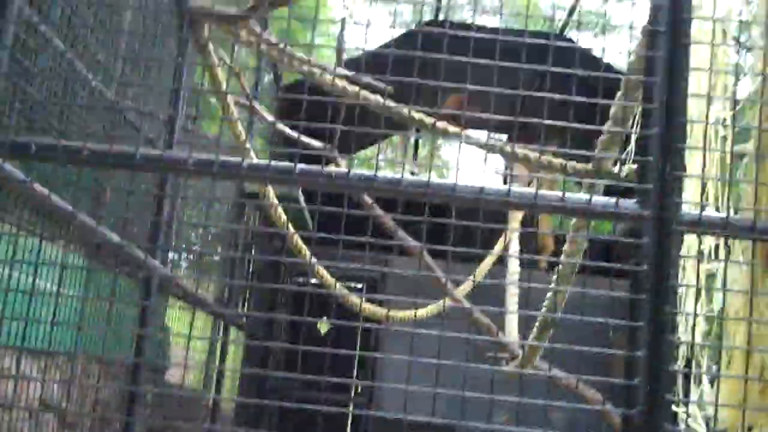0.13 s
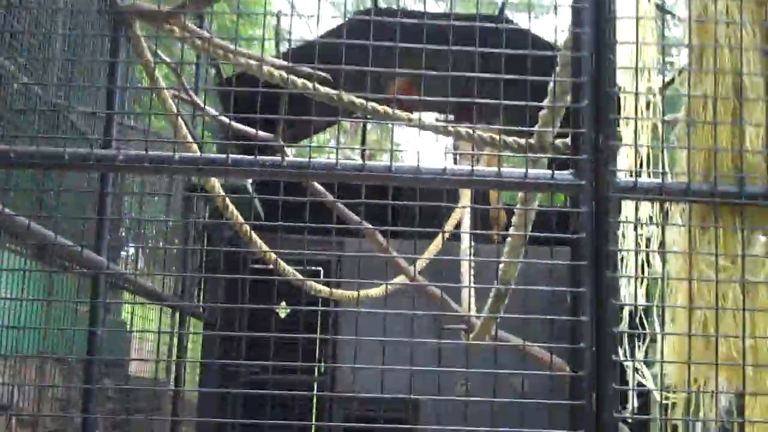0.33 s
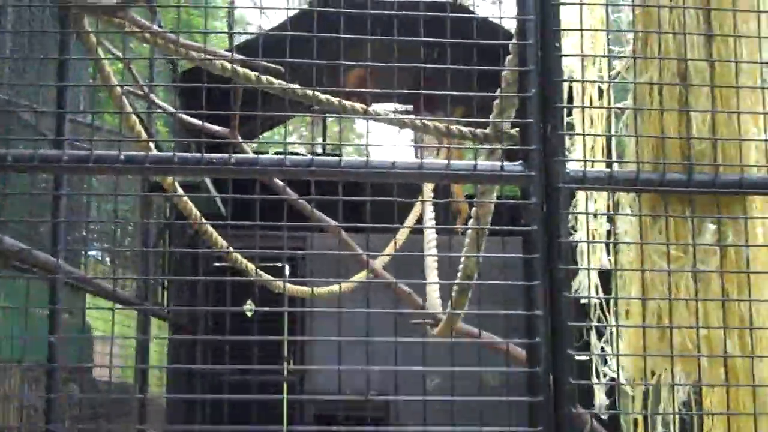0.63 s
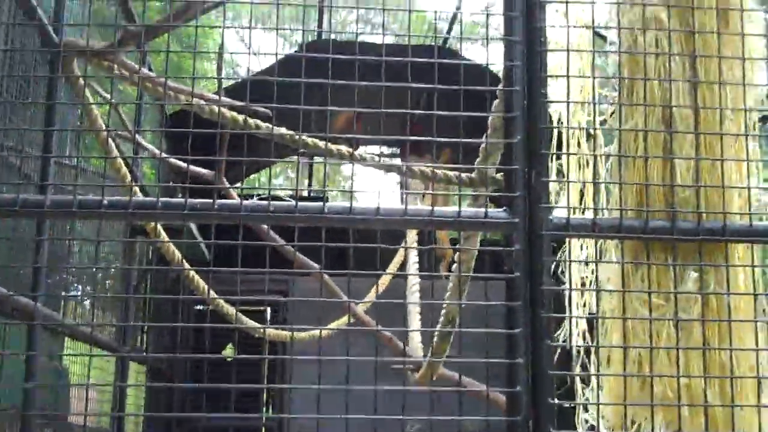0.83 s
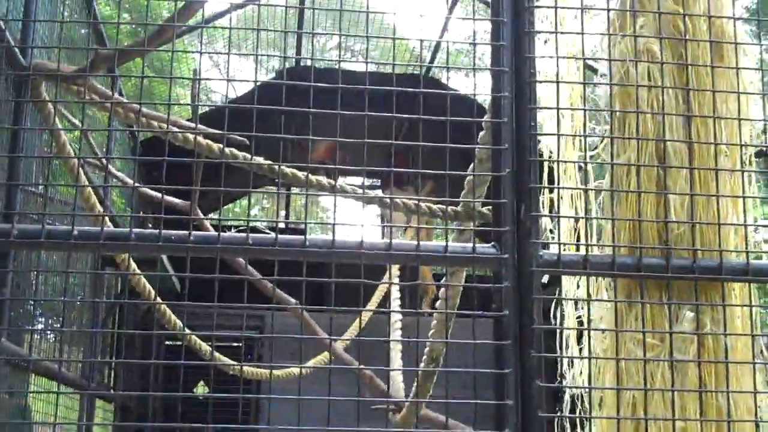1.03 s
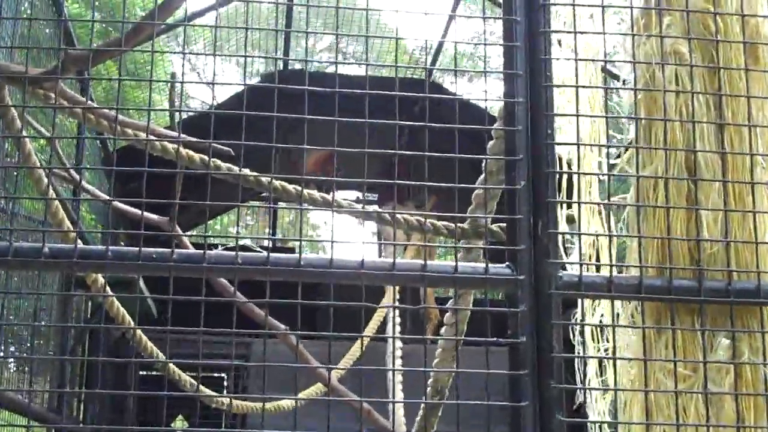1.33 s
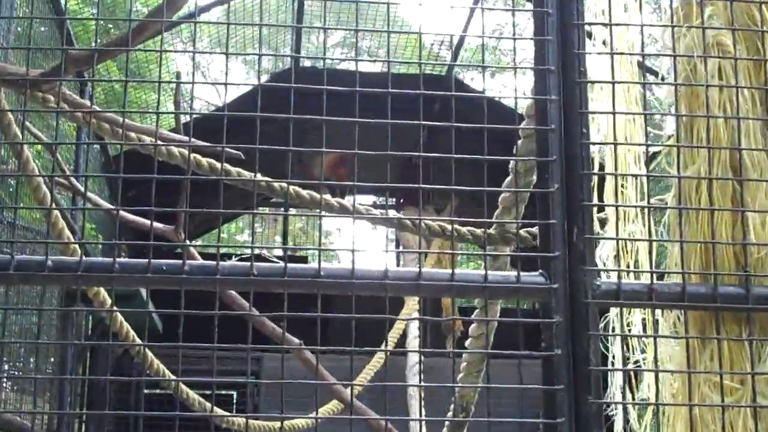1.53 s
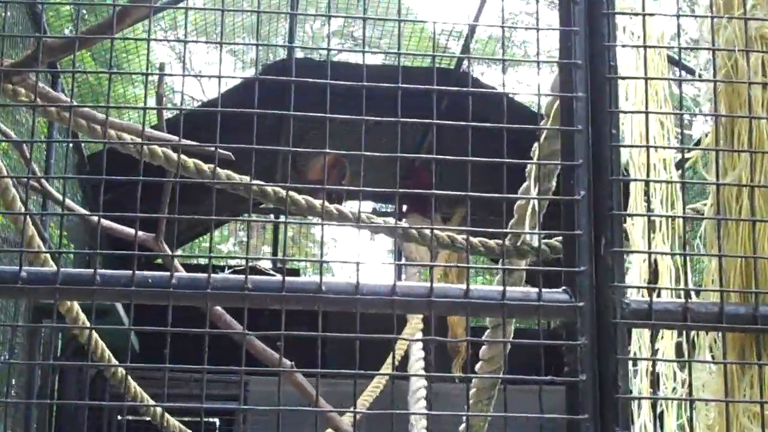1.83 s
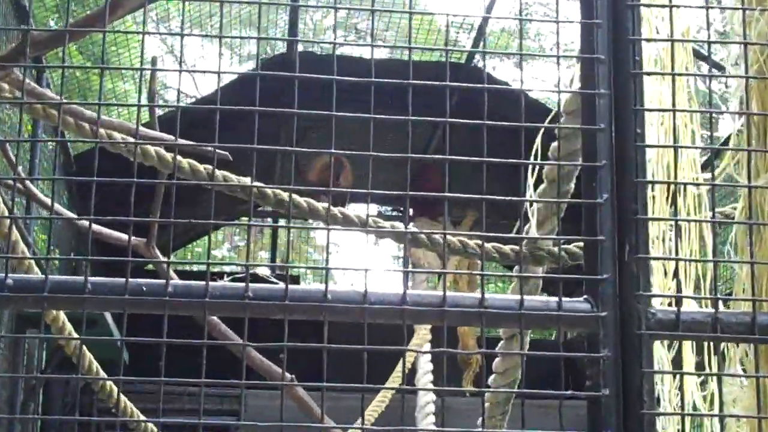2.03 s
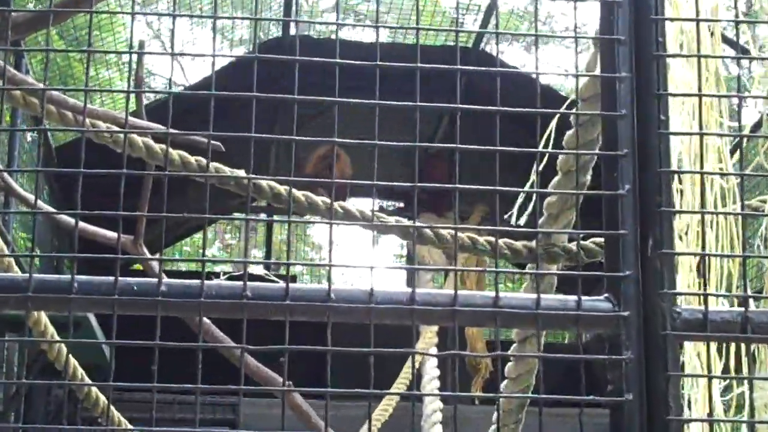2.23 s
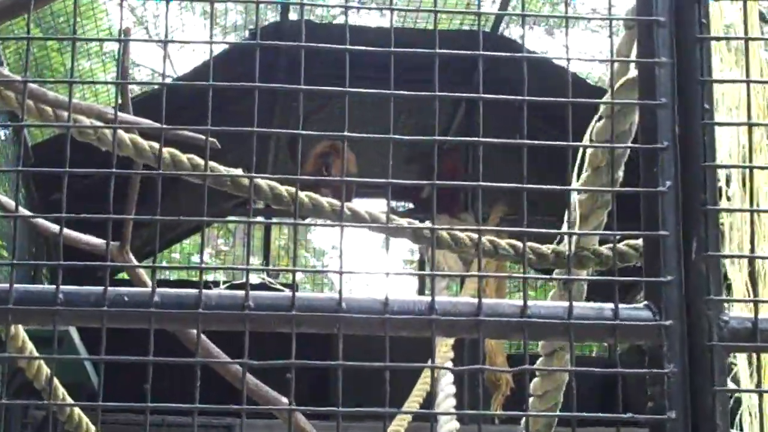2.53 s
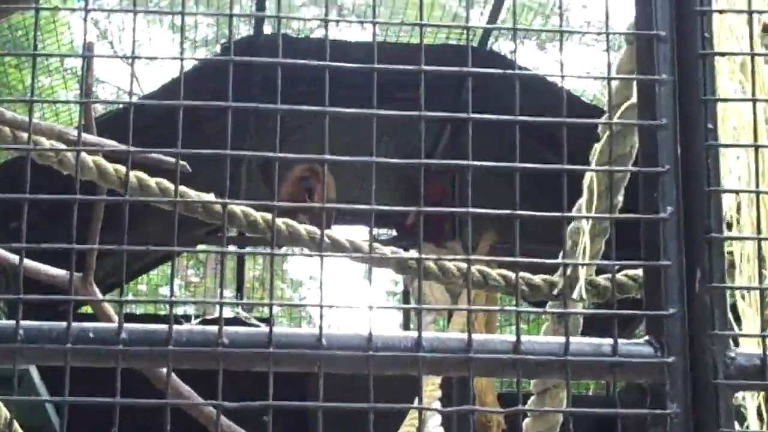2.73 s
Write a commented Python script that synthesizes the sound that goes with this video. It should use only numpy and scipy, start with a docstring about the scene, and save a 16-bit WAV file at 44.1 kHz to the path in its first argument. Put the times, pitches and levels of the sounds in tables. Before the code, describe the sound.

A howler monkey's loud, hoarse roar breaks into a rattling rasp, pauses, then swells again

```python
"""Howler monkey roaring under a roof

A howler monkey roars under the roof of its cage, a few metres from two microphones.
Source-filter synthesis: chaotic pulses of its vocal folds ring resonances of the throat and mouth.
An open roar gives way to a rattling rasp (probably drawn inwards), a short gap, then a new roar
that swells as the mouth opens. Filtered noise makes a thin squeak and a low outdoor rumble behind it."""
import sys
import numpy as np
from scipy import signal
from scipy.fft import rfft, irfft
from scipy.io import wavfile
from scipy.ndimage import uniform_filter1d

SR = 44100
rng = np.random.default_rng(int(sys.argv[2]) if len(sys.argv) > 2 else 0)


def pcm_store(signal):
    """Save signal as 16-bit PCM."""
    levels = np.round(np.clip(np.atleast_2d(signal), -1, 1) * 32767)
    wavfile.write(sys.argv[1], SR, levels.astype(np.int16).T)


N = 127449
T = np.arange(N) / SR  # time axis in seconds

# vocal folds: time_s, rate_pulses_per_s, air_share (power share of rushing air, 0-1)
FOLDS = [(0, 420, 0.24), (.47, 380, 0.24), (.56, 170, 0.21), (1.05, 105, .2), (1.42, 90, 0.19),
         (1.6, 108, 0.33), (1.9, 160, 0.13), (2.15, 330, 0.32), (2.89, 395, 0.27)]
# heaves of air in the rasp and at the restart of the roar: time_s (end of the rise), push_db
HEAVES = [(.505, 3.2), (.521, 5), (0.558, 6.5), (0.611, 4), (0.644, 2), (0.676, 4), (0.697, 5), (.732, 9),
          (.756, 4), (.838, 5.5), (.866, 4), (0.942, 5.2), (0.981, 7), (1.022, 6), (1.219, 5), (1.266, 4),
          (1.416, 5), (1.441, 3.5)]
# loudness of the voice before the trim of each band: time_s, bass_db, middle_db, treble_db
LEVELS = [(0, -16.5, -24.5, -35.5), (0.2, -16.5, -24, -35), (0.45, -17.5, -23.5, -32),
          (0.56, -17.0, -27.5, -34.5), (0.74, -19.5, -29.5, -36.5), (0.8, -21, -28.5, -40.5),
          (0.86, -20.5, -30, -35.5), (0.93, -24.5, -32, -39.5), (1.02, -22.5, -30, -37),
          (1.09, -23, -35, -46.5), (1.14, -34, -46, -52), (1.205, -45, -50.5, -52), (1.225, -38, -43, -49),
          (1.258, -35.5, -49, -53), (1.272, -33, -38, -47.5), (1.31, -23.5, -37, -47),
          (1.385, -31.5, -39.5, -47.5), (1.44, -26.5, -36.5, -43.5), (1.63, -24, -32, -48.5),
          (1.72, -25.0, -31.5, -46.5), (1.92, -22.0, -28.5, -43.5), (2.3, -20.5, -29, -39.5),
          (2.5, -18.0, -27.0, -38.5), (2.89, -18.0, -25, -38)]


def amp(db):
    """Level law: decibels to amplitude gain."""
    return 10 ** (np.asarray(db) / 20)


def evened(x):
    """Power normalisation: scales to rms 1."""
    return x / np.sqrt(np.mean(x ** 2) + 1e-20)


def curve(rows, axis=1):
    """Linear interpolation in time: one column of a time table, at every sample."""
    rows = np.array(rows)
    return np.interp(T, rows[:, 0], rows[:, axis])


def read(rows, hz, axis=1):
    """Linear interpolation on a log-frequency axis: one column of a spectrum table."""
    rows = np.array(rows)
    return np.interp(np.log(hz + 1), np.log(rows[:, 0] + 1), rows[:, axis])


def drift(hz):
    """Low-passed noise: a random wander of rms 1 that weakens above the given rate."""
    rates = np.fft.rfftfreq(N, 1 / SR)
    spectrum = rfft(rng.standard_normal(N)) / (1 + (rates / hz) ** 2)
    return evened(irfft(spectrum, N))


def colour(x, rows, axis=1, size=4096):
    """Minimum-phase filtering: the log spectrum fixes the phase, so the filter is causal."""
    hz = abs(np.fft.fftfreq(size, 1 / SR))
    log_gain = np.log(amp(read(rows, hz, axis=axis)))
    taps = np.fft.ifft(np.exp(np.conj(signal.hilbert(log_gain)))).real
    return signal.oaconvolve(x, taps[:size // 2])[:N]


def resonate(x, hz, width):
    """Heterodyned one-pole resonance of gain 1 at its centre, which follows the curve hz."""
    turn = np.exp(2j * np.pi * np.cumsum(hz * np.ones(N)) / SR)
    r = np.exp(-np.pi * abs(width) / SR)
    # shift the centre to zero frequency, smooth, shift back
    envelope = signal.lfilter([1 - r], [1, -r], x / turn + 1e-18)
    return 2 * (turn * envelope).real


def whistle(hz, width):
    """Narrow-band noise: two resonances in series make a fuzzy tone of rms 1."""
    once = resonate(rng.standard_normal(N), hz, width)
    return evened(resonate(once, hz, width))


def background():
    """Distant outdoor rumble by spectral shaping of partly correlated noise, with a wavering hum."""
    # outdoor rumble, relative spectrum: frequency_hz, level_db
    floor_colour = [(20, -9), (40, -11.5), (60, -10.5), (120, -11.5), (250, -7), (600, -11), (1500, -24),
                    (4000, -29), (9000, -31.5), (14000, -61)]
    # hum, before its tilt between the ears: frequency_hz, width_hz, level_db
    hum_tones = [(38.9, 4.9, -52.5), (81.2, 7.9, -53.5)]
    shared_level_db = -43.5
    both, left, right = (evened(colour(rng.standard_normal(N), floor_colour)) for _ in range(3))
    rumble = amp(shared_level_db) * (both + 0.22 * np.array([left, right]))
    hum = sum(amp(db) * whistle(hz, width) for hz, width, db in hum_tones)
    return rumble + hum * amp([[-2], [1.5]])  # left, right dB


def squeak():
    """Decaying narrow-band noise with its octave: a brief squeak to the right, perhaps a small bird."""
    start_s, rise_s, t60_s = 1.487, 0.01179, 0.4
    pitch_hz, width_hz, octave_db = 6280, 190, -27.5
    age = np.maximum(T - start_s, 0)
    tone = whistle(pitch_hz, width_hz) + amp(octave_db) * whistle(2 * pitch_hz, 2 * width_hz)
    fade = amp(-31.5 - 60 * age / t60_s)
    return tone * np.minimum(age / rise_s, 1) * fade * amp([[-5], [0]])  # left, right dB


def echoes(x, t60_rows, size=16384):
    """Statistical reverberation: a dense noise tail, each band dying exponentially at its own speed."""
    hz, t, z = signal.stft(rng.standard_normal(size), SR, nperseg=128)
    decay = amp(-60 * t / read(t60_rows, hz)[:, None])
    tail = signal.istft(z * decay, SR, nperseg=128)[1]
    return signal.oaconvolve(x, tail / np.linalg.norm(tail))[:N]


def heaves():
    """Amplitude modulation: sudden pushes of air break the rasp into strokes and restart the roar."""
    rise_s, fade_s = 0.002237, 0.010903
    push_db = np.zeros(N)
    for time_s, db in HEAVES:
        age = np.maximum(T - time_s + rise_s, 0)
        push_db += db * np.minimum(age / rise_s, 1) * np.exp(-(age / fade_s) ** 2)
    return amp(push_db)


def slap_times(gap):
    """Phase-reset oscillation: samples of an uneven beat that each heave of air starts afresh."""
    jitter = .17  # spread of the log of the gaps between slaps
    cycles = np.cumsum(curve(FOLDS, axis=1)) / SR
    beats = np.cumsum(np.exp(jitter * gap - jitter ** 2 / 2))
    for time_s, _ in HEAVES:
        now = np.interp(time_s, T, cycles)
        nearest = np.argmin(abs(beats - now))
        beats[nearest:] += now - beats[nearest]
    return np.searchsorted(cycles, beats)


def scatter(x):
    """All-pass diffusion: quick reflections smear each slap over milliseconds without colouring it."""
    # quick reflections: delay_s, strength (0-1)
    reflections = [(.0017, 0.26), (.0043, 0.36), (.0097, 0.24)]
    for delay, g in reflections:
        lag = np.exp(-2j * np.pi * np.fft.rfftfreq(N, 1 / SR) * delay)
        x = irfft(rfft(x) * (lag + g) / (1 + g * lag), N)
    return x


def folds():
    """Glottal excitation: irregular slaps of the folds, each freeing a noisy puff that carries treble."""
    shimmer_db, puff_shimmer_db = 1.9, 3.5  # slap-to-slap variation
    puff_s, steady_air, slap_hz = .0008, .15, 3158
    rate, air = curve(FOLDS, axis=1), curve(FOLDS, axis=2)
    gap, size = rng.standard_normal((2, 2000))
    at = slap_times(gap)
    bounded_size = np.tanh(size / 2) * 2
    # dividing by sqrt(rate) keeps the power even as the rate changes
    slaps, spurts = (np.bincount(at, amp(db * bounded_size), N + 1)[:N] / np.sqrt(rate)
                     for db in (shimmer_db, puff_shimmer_db))
    age = T[:1000] / puff_s
    opening = evened(signal.oaconvolve(spurts, age * np.exp(-age))[:N])
    puffs = evened((opening + steady_air) * rng.standard_normal(N))
    softness = np.exp(-2 * np.pi * slap_hz / SR)  # one-pole low-pass
    soft_slaps = signal.lfilter([1 - softness], [1, -softness], evened(slaps - slaps.mean()))
    flutter = amp(1.1203 * drift(60))  # rms dB, rate Hz
    return (np.sqrt(1 - air) * scatter(soft_slaps) + np.sqrt(air) * puffs) * flutter


def throat_sac(x):
    """Formant resonance: two sliding bass formants tremble with effort; their ringing is partly
    evened by its running power."""
    # bass formants of the throat sac: time_s, first_hz, second_hz
    formants = [(0, 510, 1025), (0.2, 510, 1005), (0.4, 505, 972), (0.55, 476, 945), (0.72, 460, 932),
                (0.88, 480, 930), (1.05, 538, 920), (1.33, 518, 955), (1.7, 508, 968), (2.1, 501, 980),
                (2.5, 507, 996), (2.89, 503, 1003)]
    # sharpness of each formant: width_hz, lift_db (before evening), wobble_hz (rms at full effort)
    formant_rings = [(37.8, 20, 8.7), (37.5, 19.5, 16)]
    wobble_rate_hz, ring_s, evening = 26, .02, 0.26  # evening: 0 none - 1 full
    effort = amp(curve(LEVELS, axis=1))
    for k, (width, lift_db, wobble_hz) in enumerate(formant_rings):
        tremble = wobble_hz * effort / effort.max() * drift(wobble_rate_hz)
        ring = resonate(x, curve(formants, axis=k + 1) + tremble, width)
        power = abs(uniform_filter1d(evened(ring) ** 2, int(ring_s * SR) + 1)) + 1e-6
        x = x + (amp(lift_db) - 1) * ring / power ** (evening / 2)
    return x


def mouth(x, broad, peaks, shape):
    """Vocal-tract filtering: resonances slide, swell and fade as the mouth shape goes from 0 to 1."""
    x = colour(x, broad)
    for hz0, hz1, width, *lifts_db in peaks:
        lift_db = np.interp(shape, np.linspace(0, 1, len(lifts_db)), lifts_db)
        x = x + (amp(lift_db) - 1) * resonate(x, hz0 + (hz1 - hz0) * shape, width)
    return evened(x)


def monkey(size=2601):
    """Source-filter voice: roar and rasp take turns; bass, middle and treble follow level curves."""
    # mouth in the roar: time_s, opening (0 narrow - 1 wide)
    mouth_opening = [(0, 0.98), (.5, .97), (1.3, 0), (1.48, 0.096), (1.63, 0.32), (1.87, 0.58), (2.15, .7),
                     (2.45, 0.87), (2.89, 1)]
    # upper resonances of the roar: narrow_hz, wide_hz, width_hz,
    # then lift_db with the mouth narrow, a third open, two thirds open, wide
    roar_peaks = [(1282, 1231, 64, 10, 12, 18, 17), (1948, 1897, 39, 13, 14, 22, 23.5),
                  (2570, 2330, 44, 9, 22, 18.5, 16.5), (2946, 2812, 58, 16, 11, 22, 19),
                  (3474, 3229, 56, 14, 17, 15.5, 11.5), (4060, 3989, 61, 2.5, 20, 7, 15),
                  (4250, 4420, 230, 0, -2, -10, -20), (4567.6, 4815, 49, 27.5, 14, 17, 28.5),
                  (5080, 5290, 143, 9, 15.5, 17.5, 9), (5420, 5750, 93, 4, 5, 7, 16),
                  (6620, 6580, 44, 19.5, 5, 13.955, 20.5), (7136.5, 7510, 116.9, 7.5, 12, 12.5, 14),
                  (7843, 8272.1, 160, 4, 4, 8.5, 13), (9400, 9636, 126.6, 5, 10, 15.66, 18.5),
                  (11329, 11291, 100, 0.5, 7.7, 13, 8)]
    # broad colour of the roar: frequency_hz, level_db
    roar_colour = [(90, -40.5), (200, -12), (310, -9.5), (440, -2.5), (600, -4.5), (800, -1.5), (1100, -5),
                   (1290, -11.5), (1450, -21.5), (1680, -22.5), (2100, -8), (2800, -6.5), (3500, -16),
                   (4400, -30.5), (5200, -18.5), (7000, -13.5), (8400, -18), (9100, -36), (14000, -43)]
    # tongue and jaw in the rasp: time_s, shape (0 start shape - 1 end shape)
    jaw_shape = [(.5, 0.12), (.72, 0.14234), (.9, 0.62), (1.02, 0.98), (1.2, 0.86)]
    # upper resonances of the rasp: start_hz, end_hz, width_hz, start_lift_db, end_lift_db
    rasp_peaks = [(1180, 1180, 115, 12.5, -2.5), (1846.7, 1959.3, 41, 22, 15), (2298, 2327, 51.4, 15, 18.5),
                  (2536.8, 2930, 39, 14, 13), (3130, 3470, 62, 3, 13.5), (3790, 4240, 114, 8.5, 15),
                  (4820, 4400, 86.8, 9, 10)]
    # broad colour of the rasp: frequency_hz, level_db
    rasp_colour = [(60, -23), (110, -11), (165, -14), (300, -6.5), (410, -4), (650, -6), (850, -4.5),
                   (1200, -10.5), (1380, -23), (1650, -20.5), (2100, -8.5), (2700, -7), (3600, -16.5),
                   (4400, -24), (5600, -12.5), (7000, -8), (8500, -22), (10500, -38.5), (14000, -52.5)]
    # trim of the bass, middle and treble: trim_db
    band_trim = [-0.74, 0.27, -0.7129]
    rasp_from_s, rasp_to_s, turn_s = .505, 1.215, .025

    drive = throat_sac(folds() * heaves())
    rasp = np.clip(np.minimum(T - rasp_from_s, rasp_to_s - T) / turn_s + .5, 0, 1)
    roar_voice = mouth(drive, roar_colour, roar_peaks, curve(mouth_opening))
    rasp_voice = mouth(drive, rasp_colour, rasp_peaks, curve(jaw_shape))
    voice = np.sqrt(1 - rasp) * roar_voice + np.sqrt(rasp) * rasp_voice
    low, below_treble = (signal.sosfiltfilt(signal.butter(6, hz, fs=SR, output="sos"), voice)
                         for hz in (1550, 4300))
    out = np.zeros(N)
    for k, band in enumerate([low, below_treble - low, voice - below_treble]):
        # flatten the band by its running power, then impose its level curve
        power = uniform_filter1d(uniform_filter1d(band ** 2, size), size // 2)
        level = amp(curve(LEVELS, axis=k + 1) + band_trim[k])
        out += band / np.sqrt(abs(power) + 1e-12) * level
    return out


def scene():
    """Superposition: the voice, echoes of the shelter, a wide side signal, squeak and background."""
    # shelter: frequency_hz, t60_s
    room_t60 = [(200, 1.1), (1000, 0.23), (4000, 0.1643), (12000, 0.04)]
    # echoes of the shelter: frequency_hz, level_db
    room_level = [(200, -16), (1000, -13), (3000, -9), (8000, -8)]
    # decay of the side signal: frequency_hz, t60_s
    side_t60 = [(200, .14), (2000, 0.20844), (8000, 0.13)]
    # level of the side signal, which makes the treble wide: frequency_hz, level_db
    side_level = [(250, -28), (600, -20), (1200, -17.5), (2500, -10.5), (5000, -4.5), (8000, 6.5)]
    voice = monkey()
    mid = voice + colour(echoes(voice, room_t60), room_level)
    side = colour(echoes(voice, side_t60), side_level)
    return np.array([mid + side, mid - side]) + squeak() + background()


def record(dry):
    """Linear transduction: the colour of each microphone, then a band limit."""
    # colour of the two microphones: frequency_hz, left_db, right_db
    mic_colour = [(100, -0.8, 1.5), (944, -.5, 0), (2970, -1.9, -1.77), (5100, 0.5, 2.5), (6444, -4.5, 1),
                  (7760, 0.5, -7), (8500, 0, -10.5), (12200, 4.5, -8.5)]
    edge_hz = 14200
    heard = np.array([colour(dry[k], mic_colour, axis=k + 1) for k in range(2)])
    low_pass = signal.firwin(511, edge_hz, window=("kaiser", 9), fs=SR)
    return signal.oaconvolve(heard, low_pass[None], "same")


dry = scene()
out = record(dry)
pcm_store(out)
```